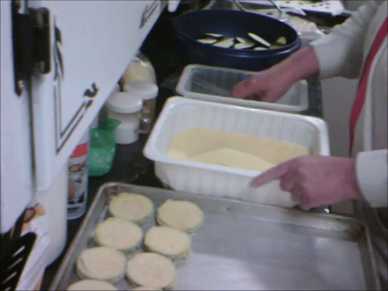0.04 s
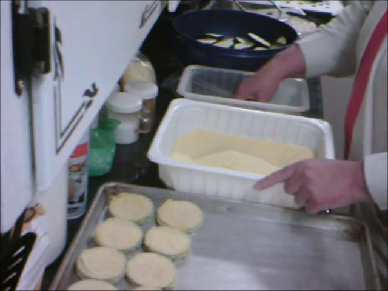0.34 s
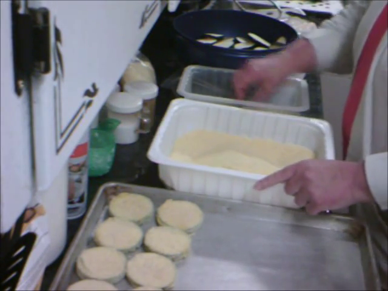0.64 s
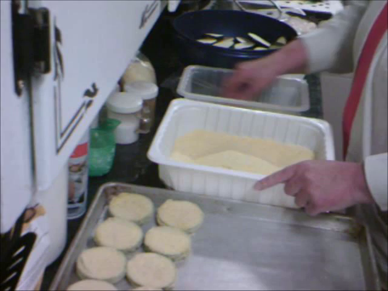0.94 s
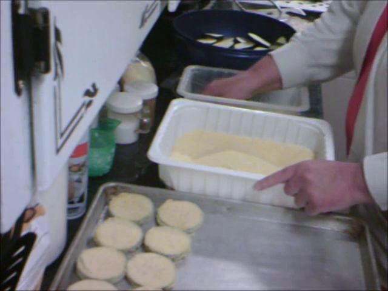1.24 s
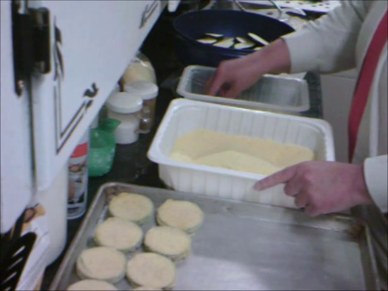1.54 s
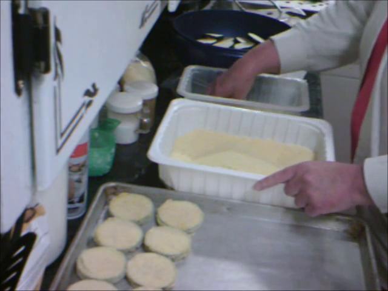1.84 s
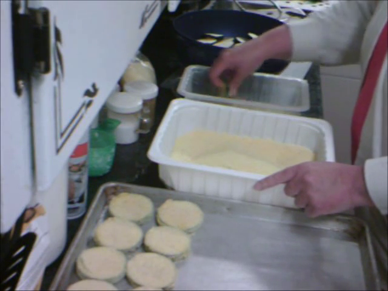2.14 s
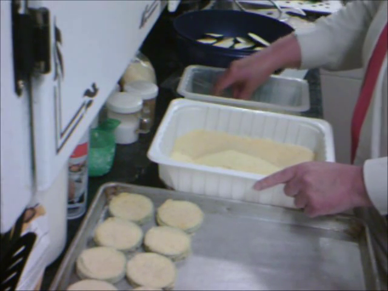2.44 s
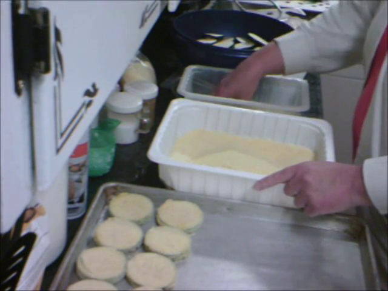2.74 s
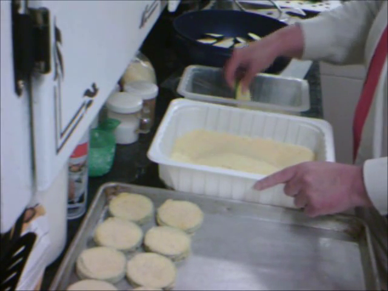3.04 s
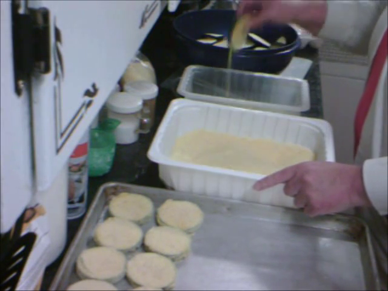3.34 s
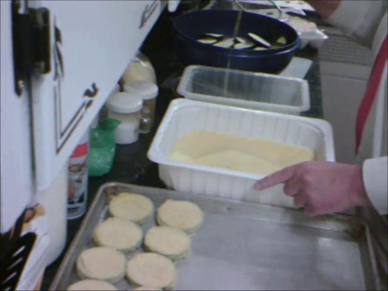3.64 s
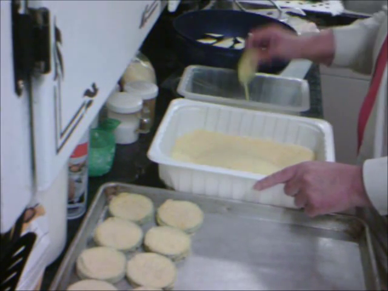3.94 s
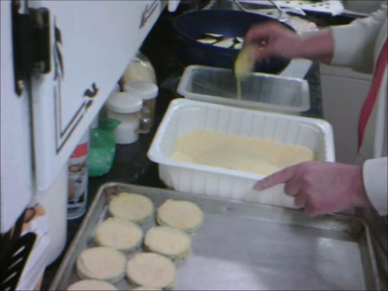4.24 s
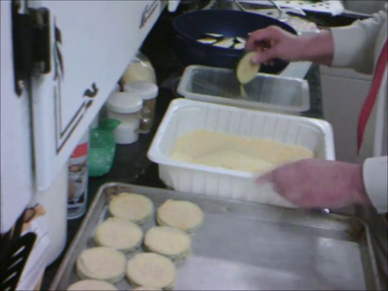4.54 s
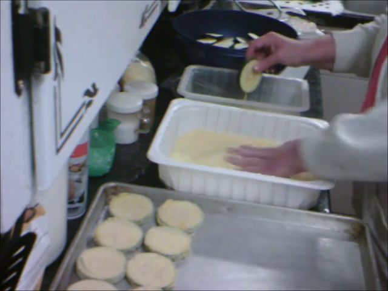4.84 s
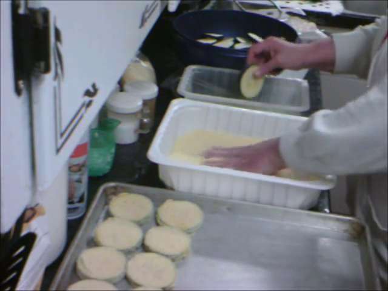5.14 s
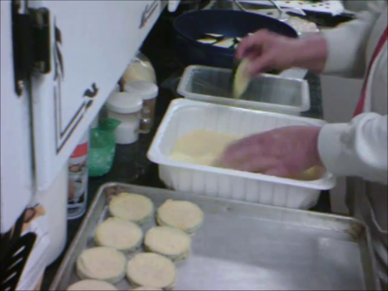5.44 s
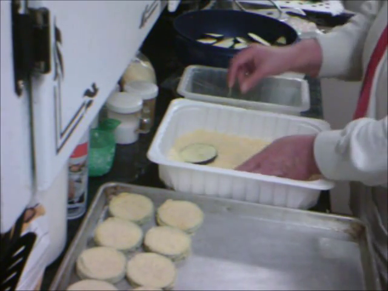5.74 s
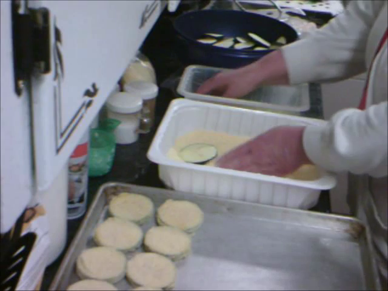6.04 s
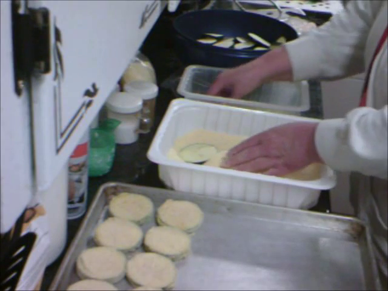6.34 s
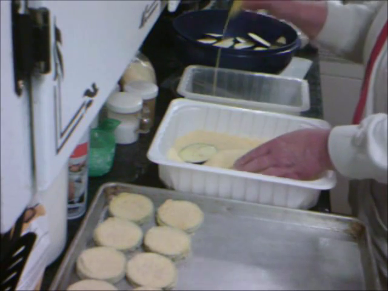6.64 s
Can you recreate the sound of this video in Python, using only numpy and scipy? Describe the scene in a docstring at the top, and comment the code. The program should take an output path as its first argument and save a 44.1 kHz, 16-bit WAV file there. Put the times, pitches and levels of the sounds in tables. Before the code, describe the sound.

A low, slowly throbbing appliance hum fills a small kitchen. Close by, vegetable slices are handled in a plastic tub: quiet rubbing and scattered hollow taps, the firmer ones thudding on the counter. After a pause, a tray of meal gives a few ticks and a brief grainy crunch as a slice lands. Hiss, a thin whine and faint high buzzing sit right at the microphone.

```python
"""Soft rubs, then hollow knocks: fingers turn zucchini slices in a thin plastic tub of beaten egg.
Next the slices drop into a plastic tray of meal; the tray rings and the dry grains crunch.
Heard from the camera's microphone in a small kitchen, with cupboards and walls close by. The counter
thuds under the firmer blows. Behind it all, appliance motors hum and beat slowly; right at the
microphone, the camera adds hiss, a thin whine and the faint high buzzes of its focus drive."""
import sys
import numpy as np
from scipy import signal
from scipy.fft import rfft, irfft
from scipy.io import wavfile
from scipy.ndimage import uniform_filter1d

SR = 44100
rng = np.random.default_rng(int(sys.argv[2]) if len(sys.argv) > 2 else 0)


def bounce(signal):
    """Save signal as a 16-bit WAV file at the path given by the first command-line argument."""
    frames = np.transpose(np.atleast_2d(signal))
    limited = np.clip(frames, -1, 1)
    pcm = np.round(limited * 32767).astype(np.int16)
    wavfile.write(sys.argv[1], SR, pcm)


N = 303960
TIME = np.arange(N) / SR
SINCE_BLOW = TIME[:SR // 3]

# ringing of the egg tub and the meal tray: (frequency [Hz], relative level [dB], t60 [s])
TUB_MODES = [(241, -8.5, 0.13), (361, -3.5, 0.05), (602, -7, 0.031), (693, -4, 0.03), (850, -8.5, 0.039),
             (960, -9.5, 0.044), (1370, -25, 0.027), (1587, -2.5, 0.038), (1736, -2.5, 0.03),
             (1897, -8.5, 0.027), (2540, -19.5, 0.041), (4470, -32, 0.025)]
TRAY_MODES = [(648, -2, 0.03), (808, 0, 0.017), (1015, -2, 0.032), (1130, -17, 0.026), (1456, -8, 0.053),
              (1594, -7, 0.032), (1863, -2, 0.027), (1992, -8.5, 0.017), (2640, -5, 0.016),
              (3640, -7, 0.015), (3820, -7, 0.013), (4360, -12, .02)]
# knocks on each container: (time [s], level [dB], colour centre [Hz], click level [dB])
TUB_KNOCKS = [(.879, -57.5, 900, -55.5), (1.159, -52.5, 560, -72), (1.712, -48.5, 800, -73),
              (1.747, -44.5, 1040, -58.5), (2.618, -45, 616, -63), (2.6325, -42, 1740, -52),
              (2.700, -48, 1140, -69)]
TRAY_KNOCKS = [(4.320, -49.5, 1100, -68), (4.578, -51, 720, -74), (5.703, -56.5, 1500, -56.5)]
# fingers and slices rubbing the plastic: (time [s], length [s], level [dB], colour centre [Hz])
TUB_RUBS = [(.0, .27, -67.5, 1160), (0.651, 0.23, -66.5, 1110), (2.29, 0.054, -66.5, 696),
            (2.74, 0.026, -65, 890), (5.779, 0.42, -70, 1080)]
TRAY_RUBS = [(4.319, 0.024, -58, 2600), (4.518, 0.087, -51.5, 2010), (4.588, .12, -65, 1900),
             (5.653, 0.043, -58.5, 740), (5.711, 0.037, -57, 420)]
# spectra of a wet click, slipping skin and grinding meal: (frequency [Hz], relative level [dB])
CLICK_SPECTRUM = [(1000, -22), (2500, 1), (4700, 10), (6300, 7), (8000, 9.5), (11000, -2)]
RASP_SPECTRUM = [(200, 2), (600, 1), (1300, -5), (2000, 0), (2400, -12), (3000, -14.5), (3700, -7.5),
                 (4500, -11.5), (6000, -21)]
MEAL_SPECTRUM = [(400, -6), (1600, 15.5), (2100, 2), (2700, 3.5), (5000, -1.5), (8000, 5.5), (11000, 1.5)]
# meal giving way under a slice or a hand: (time [s], length [s], level [dB])
CRUNCHES = [(5.693, 0.024, -49), (5.71, 0.031, -68), (6.174, 0.019, -62)]
# soft thuds of the counter: (time [s], level [dB])
THUDS = [(1.161, -43), (1.748, -32.5), (2.62, -35.5), (5.71, -38.5)]

# appliance motors at nearly the same speed, one entry each: (speed [Hz]) and (level [dB])
MOTOR_SPEEDS_HZ = [58.31, 57.95, 58.95]
MOTOR_LEVELS_DB = [-42.5, -48, -56.5]
# steady motor tones: (frequency [Hz], level [dB])
MOTOR_TONES = [(18.1, -38), (50.3, -52), (91.5, -62), (117.9, -52.5), (177.6, -69.5), (220.8, -63)]
# resonances in the appliance's rush of air: (frequency [Hz], width [Hz], relative level [dB])
RUSH_BANDS = [(412, 93, -1.5), (669.5, 74, -3), (938, 82, -5.5), (1227, 300, -15), (1570, 150, -11.5),
              (1876, 130, -16)]
# low rumble of the room: (frequency [Hz], relative level [dB])
RUMBLE_SPECTRUM = [(10, 1), (20, -19), (35, -17), (70, -16.5), (110, -25.5), (185, -23), (290, -37),
                   (2000, -57.5), (4000, -67)]

# whine of the camera's electronics: (frequency [Hz], level [dB])
WHINE_TONES = [(5800, -77), (6200, -92), (6700, -73), (7400, -87), (9600, -86)]
# spectra of amplifier hiss, focus steps and focus twitches: (frequency [Hz], relative level [dB])
HISS_SPECTRUM = [(100, 3.5), (2000, 4), (5000, 4.5), (7900, 3.5), (8600, 7.5), (9100, 4), (9350, 5.5),
                 (10200, 1.5), (11000, -7.5)]
STEP_SPECTRUM = [(7000, -59), (7850, -6), (8020, -1), (8550, 8), (9100, 7), (9330, -42), (9800, -22),
                 (10150, 5.5), (10500, -15), (11000, -3)]
TWITCH_SPECTRUM = [(7500, -26), (8800, -1), (9700, -10), (10100, 13), (10600, -18)]
# the focus drive hunts in steps; before and after, it only twitches: (start [s], end [s])
STEP_RUNS = [(2.585, 4.75)]
TWITCH_RUNS = [(.065, .56), (4.85, 5.6)]


def handling(knock_table, rub_table, modes, slide_lag_s=.008, slide_s=.048, slide_db=-15.5, slide_hz=520):
    """Hands on one container: knocks, a softer, duller finger slide after each, and separate rubs."""
    slides = [(s + slide_lag_s, slide_s, db + slide_db, slide_hz) for s, db, _, _ in knock_table]
    return knocks(knock_table, modes) + rubs(slides + rub_table, modes)


def knocks(table, modes, click_s=0.011, spatter=0.32, rebound_s=.0072, rebound_db=-5.5):
    """Each knock starts with a wet click and rings the plastic; the springy wall taps back once."""
    out = np.zeros(N)
    for s, db, centre_hz, click_db in table:
        fade_s = click_s * undb(spatter * (click_db + 65))  # a louder click spatters for longer
        for lag_s, drop_db in [(0, 0), (rebound_s, rebound_db)]:
            body = contact(plastic_ring(modes), centre_hz)
            body /= np.std(body[:SR // 100])  # the first 10 ms set the level
            click = colour(rng.standard_normal(len(SINCE_BLOW)), CLICK_SPECTRUM)
            click *= np.exp(-SINCE_BLOW / fade_s)
            add(out, s + lag_s, undb(drop_db) * (undb(db) * body + undb(click_db) * click))
    return out


def rubs(table, modes, slips_per_s=2500, rasp_db=6):
    """Skin sticks and slips on the wall; each slip rasps by itself and rings the plastic."""
    out = np.zeros(N)
    for s, length_s, db, centre_hz in table:
        push = swell(length_s)
        slips = push * grains(len(push), slips_per_s)
        body = unit(signal.fftconvolve(slips, plastic_ring(modes)))
        rasp = colour(np.pad(slips, (0, len(SINCE_BLOW) - 1)), RASP_SPECTRUM)
        rub = contact(body + undb(rasp_db) * rasp, centre_hz)
        add(out, s, undb(db) * rub / np.sqrt(np.sum(rub ** 2) / len(push)))
    return out


def plastic_ring(modes, scatter_db=-0.4, detune=0.018, split=0.022, spread_s=0.00058):
    """A container's answer to one blow; the place of the blow and the grip shift each mode a little."""
    hz, db, t60 = np.transpose(modes)[:, :, None]
    strength, shift, side = rng.standard_normal((3, len(modes), 1))
    phase = 2 * np.pi * hz * (1 + detune * shift) * SINCE_BLOW
    # opposite walls are nearly alike, so each mode has a weaker twin close by
    twins = .5 * np.sin(phase * (1 + 2 * split * np.tanh(2 * side)))
    waves = np.sign(side) * np.sin(phase) + twins
    ringing = np.sum(undb(db + scatter_db * strength) * waves * decay(t60), axis=0)
    # the ribbed walls have many more weak modes, which merge into a short papery noise
    papery = unit(soften(rng.standard_normal(len(SINCE_BLOW)), hz=1600)) * decay(t60=0.034)
    onset = 1 - np.exp(-SINCE_BLOW / spread_s)  # bending waves take a moment to spread
    return (ringing + undb(-5) * papery) * onset


def contact(x, centre_hz):
    """The place and hardness of a contact favour one region of the plastic's modes."""
    return signal.lfilter(*signal.iirpeak(centre_hz, Q=1.0, fs=SR), x)


def meal(grains_per_s=5000):
    """Dry grains in the tray grind against each other."""
    out = np.zeros(N)
    for s, length_s, db in CRUNCHES:
        push = swell(length_s)
        add(out, s, undb(db) * push * colour(grains(len(push), grains_per_s), MEAL_SPECTRUM))
    return out


def counter(low_hz=67, upper_hz=148, upper_db=-17, rise_s=0.018):
    """Under the containers, the worktop's two low modes build up and die away."""
    out = np.zeros(N)
    envelope = SINCE_BLOW / rise_s * np.exp(1 - SINCE_BLOW / rise_s)
    low = np.sin(2 * np.pi * low_hz * SINCE_BLOW)
    upper = undb(upper_db) * np.sin(2 * np.pi * upper_hz * SINCE_BLOW)
    for s, db in THUDS:
        add(out, s, undb(db) * envelope * (low + upper))
    return out


def kitchen(x, t60=0.22, wet_db=-11, dull_hz=5000, gap_s=0.0048):
    """Near cupboards and walls send a short, dull tail to the microphone just after the direct sound."""
    tail = soften(rng.standard_normal(len(SINCE_BLOW)), dull_hz) * decay(t60) * (SINCE_BLOW > gap_s)
    return x + undb(wet_db) * signal.fftconvolve(x, tail / np.linalg.norm(tail))[:N]


def appliance(in_step_s=1.17, rumble_db=-46, rush_db=-63, flutter_db=-1.04):
    """Room tone: motors beat about every three seconds over a low rumble and a resonant rush of air."""
    hum = sum(np.sqrt(2) * undb(db) * np.cos(2 * np.pi * hz * (TIME - in_step_s))
              for hz, db in zip(MOTOR_SPEEDS_HZ, MOTOR_LEVELS_DB))
    hum += sum(tone(hz, db) for hz, db in MOTOR_TONES)
    rush = np.zeros(N)
    for hz, width_hz, db in RUSH_BANDS:
        band = signal.lfilter(*signal.iirpeak(hz, hz / width_hz, fs=SR), rng.standard_normal(N))
        rush += undb(db + flutter_db * wander(rate_hz=16)) * band
    rumble = undb(rumble_db) * noise(RUMBLE_SPECTRUM)
    return hum + rumble + undb(rush_db) * unit(soften(rush, hz=2700))


def focus_drive(step_db=-60, step_s=0.026, twitch_db=-67, twitch_s=0.015):
    """Inside the camera, each step or twitch of the focus drive gives a short, high buzz."""
    steps = stutter(STEP_RUNS, np.sqrt(np.abs(swell(step_s))), gap_s=.079)
    twitches = stutter(TWITCH_RUNS, swell(twitch_s), gap_s=.065)
    hunting = undb(step_db) * steps * noise(STEP_SPECTRUM)
    return hunting + undb(twitch_db) * twitches * noise(TWITCH_SPECTRUM)


def electronics(hiss_db=-65):
    """The noise floor behind the microphone: amplifier hiss and a steady, thin whine."""
    return undb(hiss_db) * noise(HISS_SPECTRUM) + sum(tone(hz, db) for hz, db in WHINE_TONES)


def stutter(runs, envelope, gap_s, jitter=.25):
    """A short envelope repeated through each run, every time a little early or late."""
    out = np.zeros(N)
    for start, end in runs:
        for s in np.arange(start, end, gap_s):
            add(out, s + gap_s * jitter * rng.uniform(-1.03, 1), envelope)
    return out


def grains(samples, per_s):
    """Tiny impacts at random moments."""
    return (rng.random(samples) < per_s / SR) * rng.standard_normal(samples)


def tone(hz, db):
    """A sine of the given rms level."""
    return np.sqrt(2) * undb(db) * np.sin(2 * np.pi * (hz * TIME + rng.random()))


def noise(spectrum):
    """Steady noise of the given colour; rms 1."""
    return colour(rng.standard_normal(N), spectrum)


def colour(x, spectrum):
    """Shape x by (frequency [Hz], relative level [dB]) points; rms 1."""
    hz, db = np.transpose(spectrum)
    bins_hz = np.maximum(np.fft.rfftfreq(len(x), 1 / SR), 1)
    gain = undb(np.interp(np.log(bins_hz), np.log(hz), db))
    return unit(irfft(rfft(x) * gain, len(x)))


def soften(x, hz):
    """Two-pole low-pass."""
    return signal.sosfilt(signal.butter(2, hz, fs=SR, output="sos"), x)


def wander(rate_hz):
    """Smooth random drift; rms 1."""
    hold = int(SR / rate_hz)
    stairs = np.repeat(rng.standard_normal(N // hold + 1), hold)
    return unit(uniform_filter1d(stairs, hold)[:N])


def swell(length_s):
    """A rounded rise and fall."""
    return np.sin(np.linspace(0, np.pi, int(length_s * SR)))


def decay(t60):
    """The fade after a blow: 60 dB in t60 seconds."""
    return np.exp(-np.log(1000) * SINCE_BLOW / t60)


def undb(db):
    """Decibels to gain."""
    return 10 ** (np.asarray(db) / 20)


def unit(x):
    """Scale to rms 1."""
    return x / np.sqrt(np.mean(x ** 2))


def add(out, s, sound):
    """Mix a sound in at time s."""
    start = max(int(s * SR), 0)
    out[start:start + len(sound)] += sound[:N - start]


def scene():
    """One microphone in the kitchen: the cook's hands in front, room tone and camera noise beneath."""
    tub = handling(TUB_KNOCKS, TUB_RUBS, TUB_MODES)
    tray = handling(TRAY_KNOCKS, TRAY_RUBS, TRAY_MODES)
    foreground = kitchen(tub + tray + meal()) + counter()
    return (foreground + appliance() + focus_drive() + electronics())[None]


def record(dry):
    """The camera cuts the top steeply; its converter rests slightly off zero."""
    top_hz, dc_offset = 10600, .052
    return dc_offset + signal.sosfilt(signal.ellip(8, .2, 70, top_hz, fs=SR, output="sos"), dry)


dry = scene()
out = record(dry)
bounce(out)
```